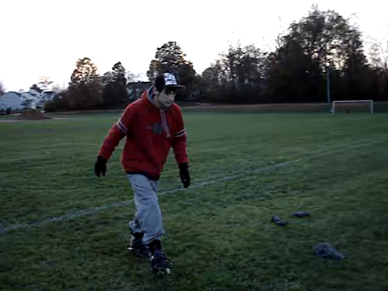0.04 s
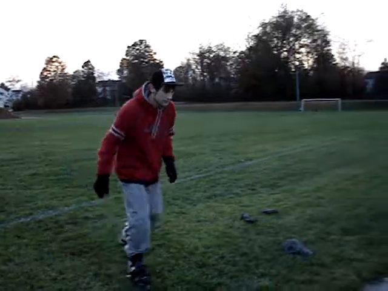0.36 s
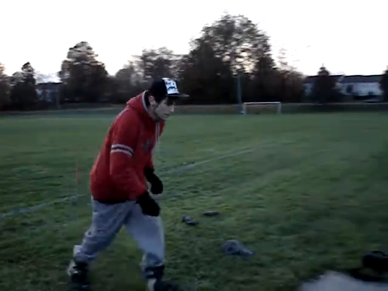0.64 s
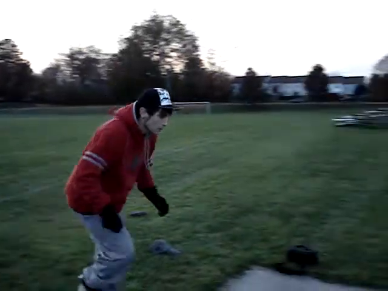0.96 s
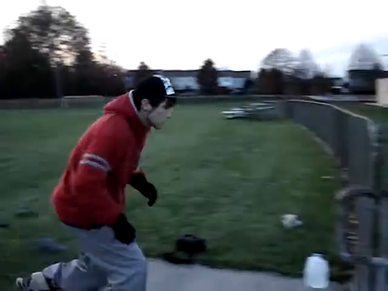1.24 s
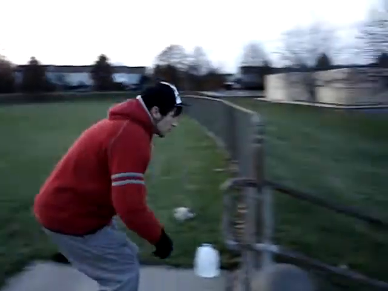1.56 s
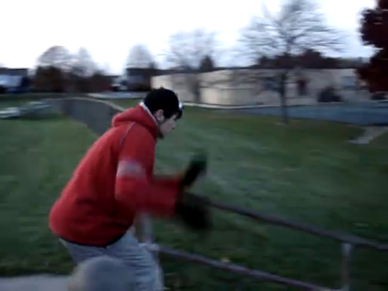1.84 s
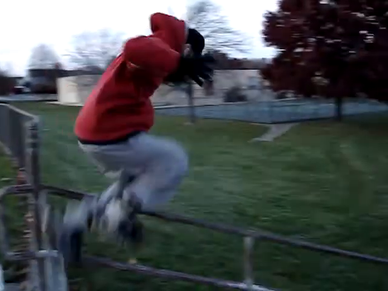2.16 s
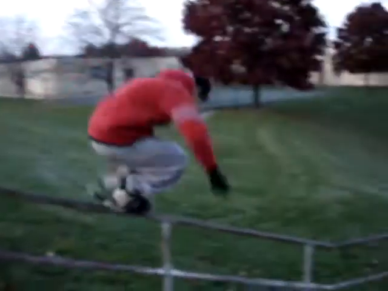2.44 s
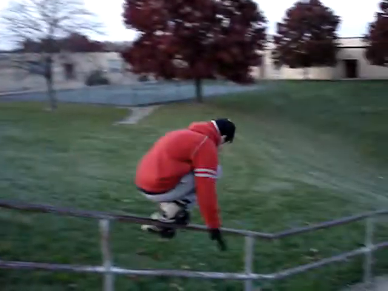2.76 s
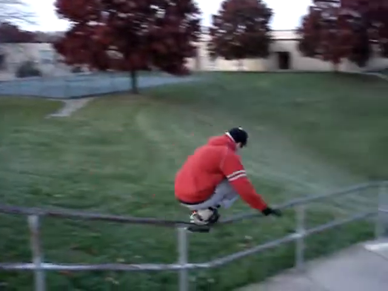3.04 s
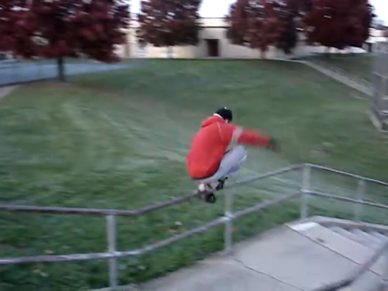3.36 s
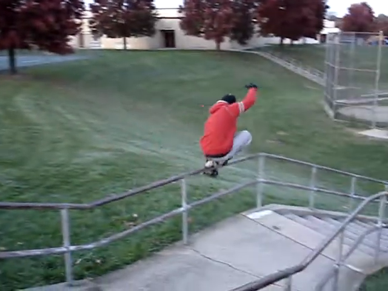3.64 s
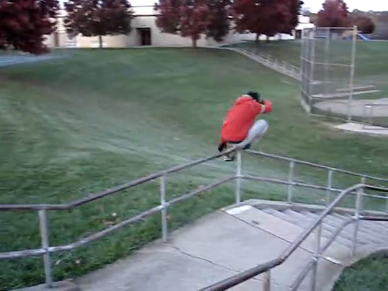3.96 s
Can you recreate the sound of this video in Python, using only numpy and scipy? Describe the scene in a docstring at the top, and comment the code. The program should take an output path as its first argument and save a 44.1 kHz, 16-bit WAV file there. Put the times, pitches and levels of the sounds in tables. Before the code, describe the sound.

Inline skates clatter over concrete, then slam onto a steel handrail and grind along it.

```python
"""Outdoors, by a steel handrail, an inline skater walks over grass, clatters across concrete and jumps.
Grass and clothes rustle, the boots creak as they stick and slip, and the wheels clack, roll and skid.
Then the plastic soles slam onto the rail. The pipe rings while they scrape along it and knock over
its bends. A small mono camera follows, and its limiter quickly turns the loudest blows down."""
import sys
import numpy as np
from scipy import signal
from scipy.fft import rfft, irfft
from scipy.io import wavfile
from scipy.ndimage import uniform_filter1d

SR = 44100
rng = np.random.default_rng(int(sys.argv[2]) if len(sys.argv) > 2 else 0)


def output_pcm(signal):
    """Save a mono or channel-first signal as 16-bit PCM at the path in sys.argv[1].

    Samples are clipped to [-1, 1] before scaling.
    """
    pcm = np.clip(np.atleast_2d(signal).T, -1, 1) * 32767
    wavfile.write(sys.argv[1], SR, np.round(pcm).astype(np.int16))


N = 176400
TIME = np.arange(N) / SR

# Each COLOUR table says how strong the low and high parts of one sound are: pitch_hz, level_db
AIR_COLOUR = [(15, -42), (25, -31.5), (172, -3), (251, -9.5), (348, -17), (375, -13), (506, -20.5),
              (546, -5.5), (701, -7), (948, -12), (1530, -25.5), (3320, -35.5), (6530, -61), (7980, -33.5),
              (10000, -41), (13000, -79), (22000, -120)]  # distant outdoor rumble
RUSTLE_COLOUR = [(100, -17), (400, -1), (900, 0), (1800, -3.5), (3000, -7.5), (5500, -10.5), (10000, -21)]  # grass and clothes
ROLL_COLOUR = [(50, -15.5), (130, -6), (330, 6), (500, 1), (850, 7), (1250, -3), (1700, -2.5), (2100, -11),
               (2800, -10.5), (4000, -24.5), (6500, -35), (10000, -39.5)]  # rolling wheels
SKID_COLOUR = [(800, -23), (2500, -5), (4800, 4), (6500, -3.5), (10000, -8)]  # skidding wheels
RUB_COLOUR = [(200, -22), (700, -3), (1200, 6), (1800, 0), (2500, -5), (3200, -17), (8000, -36)]  # rubbing boots
CLACK_COLOUR = [(40, -30), (150, -25), (330, -3.5), (480, -8.5), (850, 7), (1200, -4.5), (1600, -2.5),
                (1950, -5), (2600, -3.5), (3500, -10), (5500, -18), (10000, -34)]  # the crack of a step
THUMP_COLOUR = [(30, -8), (70, -11), (130, -13.5), (260, 6.5), (400, 1), (700, -18), (3000, -51)]  # the thud under it
WEAK_TONE_COLOUR = [(280, -2.5), (500, -8.5), (750, 5.5), (1200, -3.5), (1600, -6), (2150, -2), (2700, -9),
                    (3300, -10), (4400, -7), (4850, 2.5), (5300, -1.5), (6200, -10), (8000, -28)]  # the railing's many weak tones
KNOCK_COLOUR = [(30, -6), (55, -12), (90, -22), (200, -19), (350, -3.5), (500, -15), (750, 4.5), (1200, -6),
                (2100, 5), (2900, 3), (3900, -5), (4900, 0), (5600, -3), (7000, -10.5), (10000, -13.5)]  # soles hitting the pipe
JUDDER_COLOUR = [(60, -44), (230, -21), (350, -4.5), (520, -5), (740, 4), (1100, -6), (1600, -3),
                 (3000, -14), (8000, -41)]  # the shaking pipe
SCRAPE_COLOUR = [(30, -35), (90, -34), (170, -35), (350, -20), (500, -8), (700, -8), (900, 11.5),
                 (1200, 3.5), (1550, 6.5), (2200, 7.5), (3000, 3.5), (4000, -6.5), (6000, -22),
                 (10000, -34)]  # sliding soles
HISS_COLOUR = [(100, -40), (500, -30), (2500, 2.5), (4200, -1), (5000, 2.5), (5700, 3), (6400, 0.5),
               (7300, -3), (8400, -7.5), (9400, -3.5), (10200, -20)]  # the hiss above the scrape

# Grass crunches and clothes rustle: time_s, level_db
RUSTLE_LEVELS = [(.08, -50.5), (.33, -49), (.38, -55), (.55, -47.5), (.7, -46.5), (.86, -47), (1.08, -44),
                 (1.2, -45), (2.1, -55), (2.18, -47.5), (2.27, -42.5), (2.42, -51)]
# Wheels roll on concrete: time_s, level_db
ROLL_LEVELS = [(1.1, -92), (1.2, -34), (1.32, -41.5), (1.5, -34), (1.58, -37.5), (1.65, -27.5),
               (1.78, -33.5), (1.86, -30.5), (1.94, -24), (1.99, -38), (2.08, -34.5), (2.14, -45.5),
               (2.4, -50), (2.45, -92)]
# Wheels skid sideways: middle_s, width_s, level_db
SKIDS = [(1.41, 0.042, -43), (1.73, 0.032, -45.5), (1.92, 0.047, -38.5), (2.05, 0.049, -38.5)]
# Boots creak: start_s, length_s, slips_per_s, level_db, pitch_hz, snap_db
CREAKS = [(.728, .07, 310, -36, 1700, -20), (.897, .125, 135, -35.5, 950, -7)]
# Tones of the boot shell (a fade is the time to fall by 60 dB): pitch_hz, level_db, fade_s
BOOT_TONES = [(736, -23, 0.03), (870, -17, 0.012), (1255, -8, 0.056), (1580, 3.5, 0.025),
              (1786, 2.5, 0.024), (2250, -1, 0.0094), (2430, -13, 0.0093)]
# Wheels and frames hit the ground: start_s, level_db, fade_s, extra_thump_db
CLACKS = [(0.467, -49, 0.013, 7), (0.579, -43, 0.014, -4), (.795, -35, 0.013, -13), (0.825, -32, 0.017, 4),
          (0.834, -33.5, 0.012, 0), (1.05, -35.5, 0.043, -2), (1.123, -29.5, 0.053, 10.5),
          (1.168, -29.5, 0.024, -10), (1.193, -27, 0.041, -6), (1.208, -29.5, 0.1, -1),
          (1.2505, -6, 0.028, -7), (1.263, -15.5, 0.025, -3), (1.596, -15, 0.023, 5),
          (1.6122, -19.5, 0.0081, 9), (1.6182, -22.5, 0.024, 10.5), (1.664, -27, 0.021, -4),
          (1.776, -23.5, 0.028, 7), (1.8064, -11, 0.12, 5.5), (1.818, -4, 0.085, 7.5),
          (1.953, -3, 0.059, -2), (1.965, -8, .025, 9.5), (2.003, -28, 0.018, -16),
          (2.062, -30, 0.055, -15), (2.075, -25, .05, -22), (2.119, -34.5, 0.043, -18)]
# Hollow tones of wheel and frame: pitch_hz, level_db, fade_s
FRAME_TONES = [(335, -13, .035), (830, -7, .028), (1020, -12, .025), (1620, -12, .02), (2450, -7, .018),
               (2700, -7, .016)]
# Tones of the steel pipe as it flexes: pitch_hz, struck_db, fade_s, scraped_db
PIPE_TONES = [(118.4, -42, 2.5, -63), (339, -27, .8, -57), (377, -28, .6, -60), (602.6, -15, .7, -47),
              (650, -18, .6, -51), (687.5, -11.5, .7, -44), (860, -30, .7, -47), (904, -25, .6, -54),
              (979, -26, .6, -54), (1065, -26, .5, -52), (1357.6, -25, .6, -49), (1398, -26, .6, -52),
              (1819, -25, .55, -53), (1968, -28, .6, -50), (2217, -26, .5, -53), (2745, -25, .5, -56),
              (4778, -17, .28, -59), (4877.5, -12, .35, -56), (4978, -21, .3, -58), (5117, -22, .3, -59)]
# Soles strike the rail: start_s, knock_db, fade_s, ring_db, cutoff_hz
RAIL_HITS = [(2.429, -10, .15, 0, 9000), (2.4465, -12, .1, -34, 9000), (3.105, -14, .06, -24, 3200),
             (3.112, -15, .06, -27, 3200), (3.122, -23, .05, -29, 2600), (3.138, -13, .05, -12, 1300),
             (3.157, -14, .05, -26, 7000), (3.914, -21, .08, -24, 2800), (3.99, -20, .06, -24, 3500)]
# Soles bite hard and almost squeal: middle_s, width_s, level_db, pitch_hz
BITES = [(2.765, 0.023, -30, 2250), (2.865, 0.033, -34, 1930), (3.0, 0.035, -30.5, 5600),
         (3.39, 0.074, -34.5, 5900), (3.64, 0.062, -34, 2260), (3.93, 0.041, -28.5, 2220)]
# The pipe shakes as the soles press into a bend: middle_s, width_s, level_db
JUDDERS = [(3.225, 0.079, -26.5), (3.98, 0.075, -27.5)]
# Soles slide along the rail: time_s, scrape_db, hiss_db
GRIND_LEVELS = [(2.42, -73, -94), (2.435, -15, -39), (2.6, -28.5, -30), (2.76, -29, -30.5),
                (2.9, -29.5, -29.5), (3.01, -29.5, -28.5), (3.07, -31, -33), (3.14, -24, -40),
                (3.2, -34.5, -34), (3.32, -33.5, -35.5), (3.41, -28.5, -35), (3.56, -32.5, -34),
                (3.64, -31.5, -33), (3.78, -31.5, -31.5), (3.88, -33, -34.5), (3.93, -31, -40),
                (4.0, -23.5, -37.5)]


def from_db(db):
    """Turn decibels into a number to multiply by."""
    return 10 ** (np.asarray(db) / 20)


def unit_level(x):
    """Scale a sound so that its average strength (rms) is 1."""
    return x / np.sqrt(np.mean(x ** 2) + 1e-20)


def level_curves(rows):
    """Join rows of (time_s, level_db, ...) into one loudness curve per level column."""
    times, *columns = np.transpose(rows)
    return [from_db(np.interp(TIME, times, column)) for column in columns]


def swells(rows):
    """Smooth rises and falls from rows of (middle_s, width_s, level_db)."""
    return sum(from_db(db) * np.exp(-((TIME - middle) / width) ** 2) for middle, width, db in rows)


def db_at_pitch(table, hz):
    """Look up a pitch in a colour table."""
    pitches, db = np.transpose(table)
    return np.interp(np.log(hz + 1), np.log(pitches), db)


def colour(x, table):
    """Shape a sound's lows and highs; its strength comes out as 1."""
    hz = np.arange(N // 2 + 1) * SR / N
    return unit_level(irfft(rfft(x) * from_db(db_at_pitch(table, hz)), N))


def noise(table):
    """Steady noise with the given colour."""
    return colour(rng.standard_normal(N), table)


def even_noise(table):
    """Noise with its strength evened out, so that a blow's shape alone sets the force."""
    x = noise(table)
    return x / np.sqrt(uniform_filter1d(x ** 2, size=260) + 1e-3)


def drift(turns_per_s):
    """A random wander, mostly between -1 and 1."""
    return np.interp(TIME * turns_per_s, np.arange(2000), rng.standard_normal(2000))


def fade(start_s, fade_s):
    """A sudden start that dies away."""
    return (TIME >= start_s) * from_db(-60 * np.clip((TIME - start_s) / fade_s, 0, 4))


def blow(start_s, rise_s, hold_s, fade_s):
    """The shape of a hit: rise quickly, hold briefly, die away."""
    rise = np.clip((TIME - start_s) / rise_s, 0, 1)
    return rise * from_db(-60 * np.clip((TIME - start_s - hold_s) / fade_s, 0, 4))


def ring(x, hz, fade_s):
    """Each click in x sets off a fading tone as tall as the click."""
    shrink = np.exp(-np.log(1000) / (fade_s * SR))
    angle = 2 * np.pi * hz / SR
    return signal.lfilter([0, np.sin(angle)], [1, -2 * shrink * np.cos(angle), shrink ** 2], x + 1e-18)


def ring_body(x, tones):
    """Ring several tones of one object, every second one flipped upside down."""
    return sum((-1) ** k * from_db(db) * ring(x, hz, fade_s) for k, (hz, db, fade_s) in enumerate(tones))


def background(rumble_db=-46, whine_db=-64):
    """Distant outdoor rumble and the camera's thin whine."""
    rumble = noise(AIR_COLOUR)
    whine = unit_level(ring(rng.standard_normal(N), hz=7875, fade_s=0.092))
    return from_db(rumble_db) * rumble + from_db(whine_db) * whine


def rustle():
    """Grass and clothes brush and crunch unevenly."""
    brushing = noise(RUSTLE_COLOUR) * from_db(2 * drift(35) + 2.6 * drift(300))
    return brushing * level_curves(RUSTLE_LEVELS)[0]


def wheels():
    """Hard wheels rumble over gritty concrete and skid sideways."""
    roll = noise(ROLL_COLOUR) * from_db(1.2 * drift(70) + 1.5 * drift(350))
    skid = noise(SKID_COLOUR) * from_db(3 * drift(120))
    return roll * level_curves(ROLL_LEVELS)[0] + skid * swells(SKIDS)


def boot_creaks(rub_share=.3, jitter=.05, edge_s=.012):
    """Almost regular slips snap and ring the boot shell, with soft rubbing between them."""
    out = 0
    for start, length, slips_per_s, db, hz, snap_db in CREAKS:
        slip_count = np.floor(np.cumsum(slips_per_s * (1 + jitter * drift(150))) / SR)
        slips = np.diff(slip_count, prepend=0) * from_db(2.2 * drift(200))
        shell = 4.5 * ring(slips, hz, fade_s=.008) + ring_body(slips, BOOT_TONES)
        snaps = signal.lfilter([1], [1, -.98], slips) * noise(RUSTLE_COLOUR)  # a puff per slip
        creak = np.sqrt(1 - rub_share) * unit_level(shell) + np.sqrt(rub_share) * noise(RUB_COLOUR)
        pressure = np.clip(np.minimum(TIME - start, start + length - TIME) / edge_s, 0, 1) ** .5
        out += from_db(db) * pressure * (creak + from_db(snap_db) * unit_level(snaps))
    return out


def steps(rise_s=0.000857, hold_s=0.0026, thump_db=-14, tail_db=-21):
    """Each step is a plastic crack, a hollow ring of the frame, a thump and a faint outdoor tail."""
    crack, clicks, thump, tail = np.zeros((4, N))
    for start, db, fade_s, extra_thump_db in CLACKS:
        crack += from_db(db) * blow(start, rise_s, hold_s, fade_s)
        clicks[int((start + rise_s) * SR)] += from_db(db)
        thump += from_db(db + thump_db + extra_thump_db) * blow(start, rise_s, hold_s, fade_s=0.03)
        tail += from_db(db + tail_db) * fade(start, fade_s=0.19)
    return (crack * even_noise(CLACK_COLOUR) + ring_body(clicks, FRAME_TONES)
            + thump * even_noise(THUMP_COLOUR) + tail * noise(CLACK_COLOUR))


def railing_weak_tones(count=420, base_fade_s=0.34):
    """One second of the many weak, close tones that a tap wakes in the welded railing."""
    t, out = TIME[:SR], 0
    pitches = np.linspace(17, 88, count) ** 2  # about 290 to 7700 Hz
    for hz, (shift, size, phase, life) in zip(pitches, rng.random((count, 4))):
        hz += (shift - .5) * np.sqrt(hz) / 2
        db = db_at_pitch(WEAK_TONE_COLOUR, hz) + 5.6 * (size - .5)
        fade_s = base_fade_s * (0.96 + 0.34 * life)
        out += from_db(db - 60 * t / fade_s) * np.sin(2 * np.pi * (hz * t + phase))
    return out / np.sqrt(np.mean(out[:SR // 20] ** 2))  # strength 1 over the first 50 ms


def rail_hits(weak_tones, weak_db=-17, waver_db=1.5, build_s=.028):
    """The soles knock on the pipe and its ringing builds up and dies away; glancing blows are duller."""
    t, main_tones = TIME[:SR], 0
    for hz, db, fade_s, _ in PIPE_TONES:
        loudness = from_db(db + waver_db * drift(30)) * fade(0, fade_s)
        main_tones += loudness[:SR] * np.sin(2 * np.pi * (hz * t + rng.random()))
    ringing = (main_tones + from_db(weak_db) * weak_tones) * (1 - np.exp(-t / build_s))
    contact, out = even_noise(KNOCK_COLOUR), 0
    for start, knock_db, fade_s, ring_db, cutoff_hz in RAIL_HITS:
        knock = from_db(knock_db) * blow(start, rise_s=.0012, hold_s=.005, fade_s=fade_s) * contact
        pipe = from_db(ring_db) * np.pad(ringing, (int(start * SR), N))[:N]
        cut_highs = signal.butter(3, cutoff_hz, fs=SR, output="sos")
        out += signal.sosfilt(cut_highs, knock + pipe + 1e-18)
    return out


def sole_bites():
    """The plastic soles ring briefly, almost squealing, where they bite hardest."""
    out = 0
    for middle, width, db, hz in BITES:
        squeal = np.gradient(ring(rng.standard_normal(N), hz, fade_s=0.0059))
        out += swells([(middle, width, db)]) * unit_level(squeal)
    return out


def tiny_catches(per_s=9000, spread_db=2.5):
    """Plastic catches on steel in random clicks of uneven size."""
    clicks = (rng.random(N) < per_s / SR) * rng.choice([-1, 1], N)
    return clicks * from_db(spread_db * np.minimum(rng.exponential(1, N), 5))


def grind(weak_tones, chatter_db=1.36, ring_share=0.3):
    """Thousands of tiny catches a second scrape, hiss and keep the pipe singing; bends make it shake."""
    scrape_level, hiss_level = level_curves(GRIND_LEVELS)
    chatter = from_db(chatter_db * drift(59.35))
    catches = tiny_catches() * chatter
    railing = unit_level(signal.fftconvolve(catches, weak_tones)[:N])
    scrape = np.sqrt(1 - ring_share) * colour(catches, SCRAPE_COLOUR) + np.sqrt(ring_share) * railing
    singing = sum(from_db(db) * unit_level(ring(catches, hz, fade_s)) for hz, _, fade_s, db in PIPE_TONES)
    usual_level = np.mean(scrape_level[TIME > RAIL_HITS[0][0]])  # average after landing on the rail
    hiss = hiss_level * chatter * colour(tiny_catches(), HISS_COLOUR)
    judder = swells(JUDDERS) * noise(JUDDER_COLOUR)
    return scrape_level * (scrape + singing / usual_level) + hiss + judder


def scene():
    """All the sounds meet at one microphone, the same in both channels."""
    weak_tones = railing_weak_tones()
    mono = background() + rustle() + wheels() + boot_creaks() + steps()
    mono += rail_hits(weak_tones) + grind(weak_tones) + sole_bites()
    return np.array([mono, mono])


def record(dry, start_s=.078, limit_db=-15.5, react_s=0.0029, recover_db_per_s=202, ceiling=.95):
    """The camera switches on, turns loud blows down, rounds off peaks and cuts the highest treble."""
    smoothing = np.exp(-1 / (react_s * SR))
    power = signal.lfilter([1 - smoothing], [1, -smoothing], dry[0] ** 2)
    excess_db = np.maximum(10 * np.log10(power + 1e-12) - limit_db, 0)
    recovery_db = recover_db_per_s * TIME
    dip_db = np.maximum.accumulate(excess_db + recovery_db) - recovery_db  # dip fast, come back steadily
    limited = dry * from_db(-dip_db) * (TIME > start_s)
    rounded = ceiling * np.tanh(limited / ceiling)
    cut_highs = signal.ellip(12, .2, 70, 10200, fs=SR, output="sos")  # steep drop above 10200 Hz
    return signal.sosfilt(cut_highs, rounded)


dry = scene()
out = record(dry)
output_pcm(out)
```